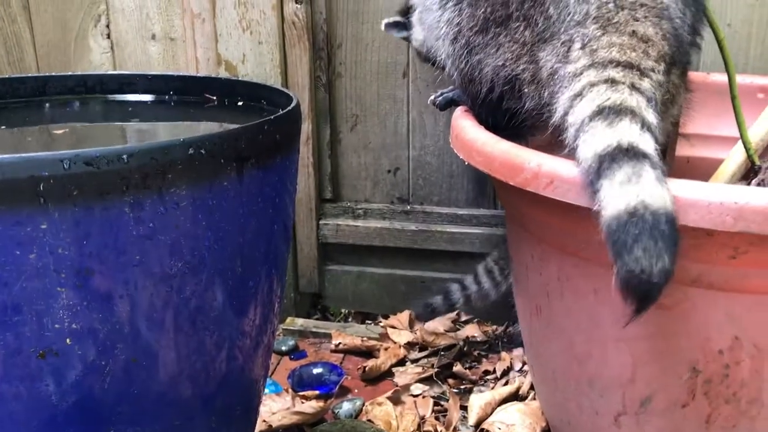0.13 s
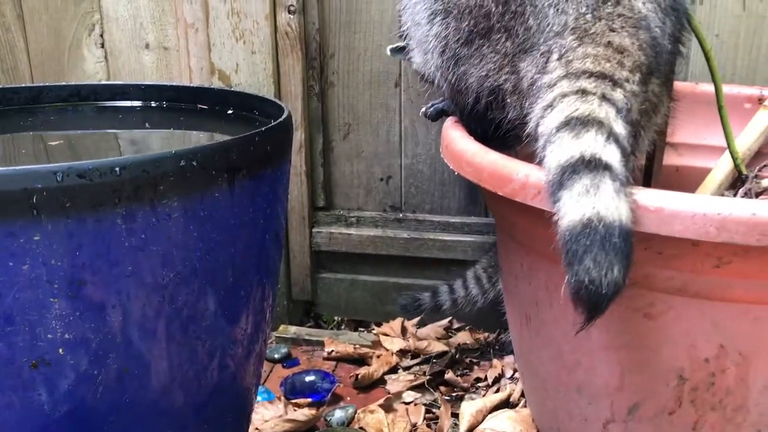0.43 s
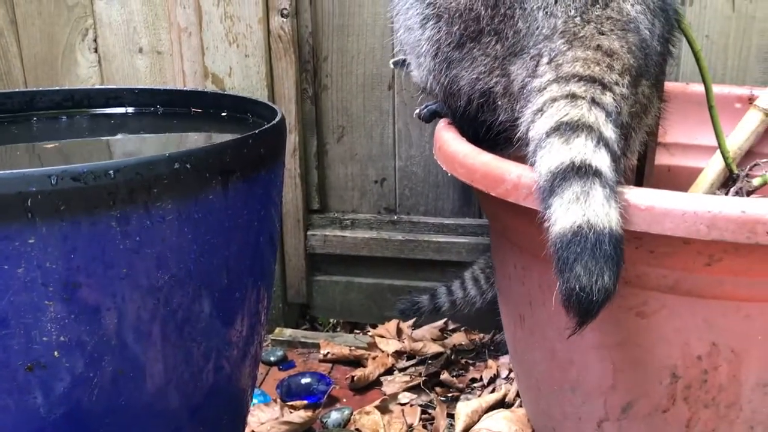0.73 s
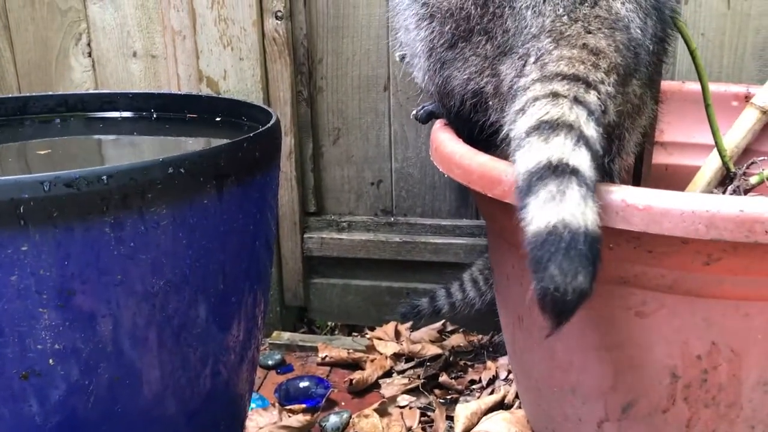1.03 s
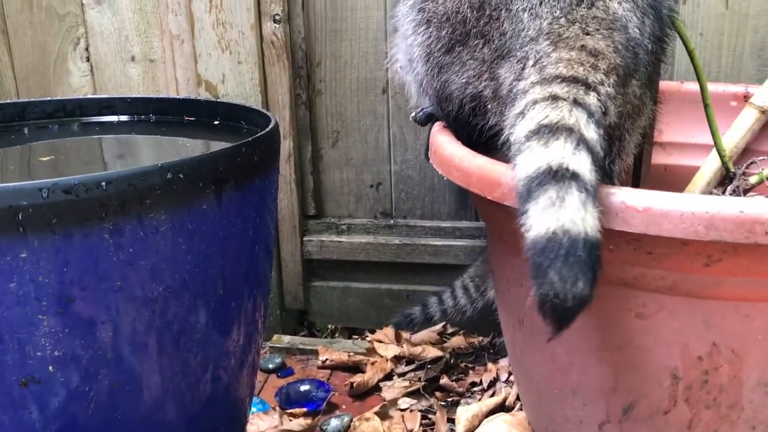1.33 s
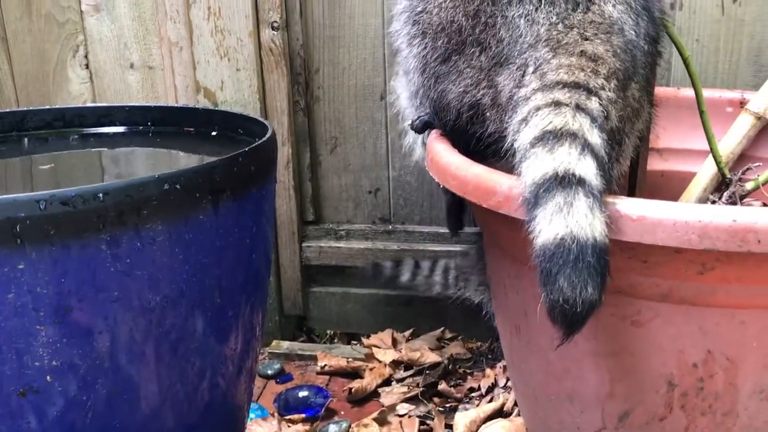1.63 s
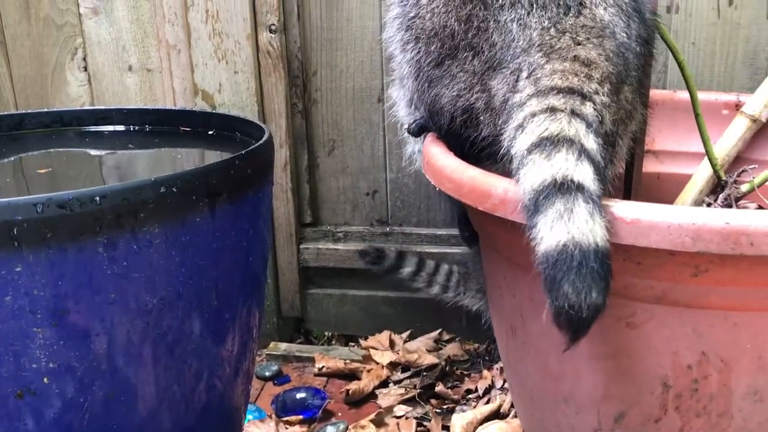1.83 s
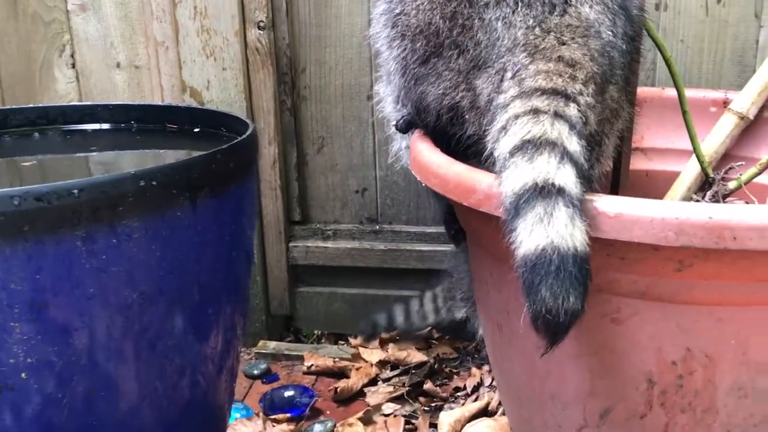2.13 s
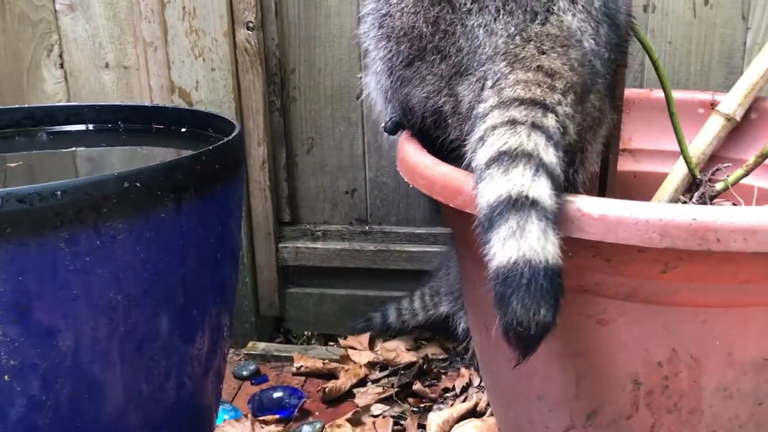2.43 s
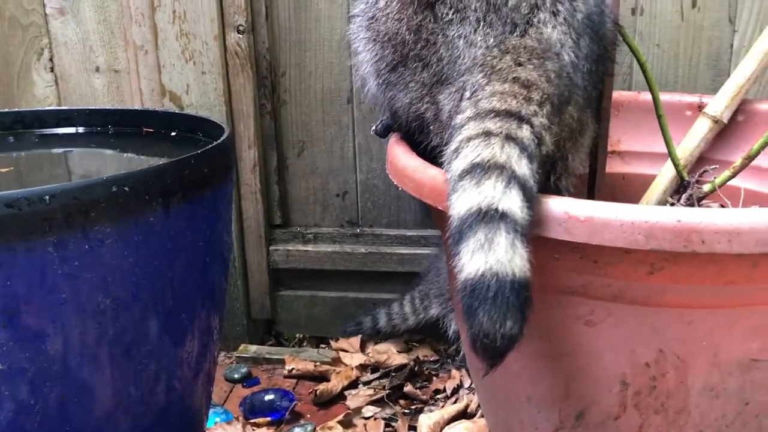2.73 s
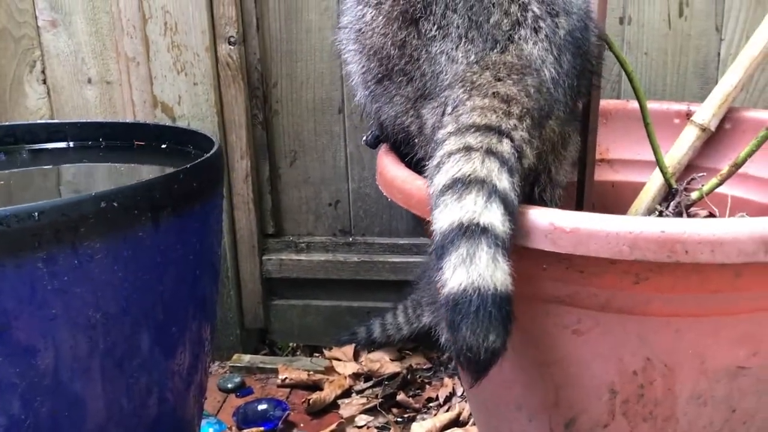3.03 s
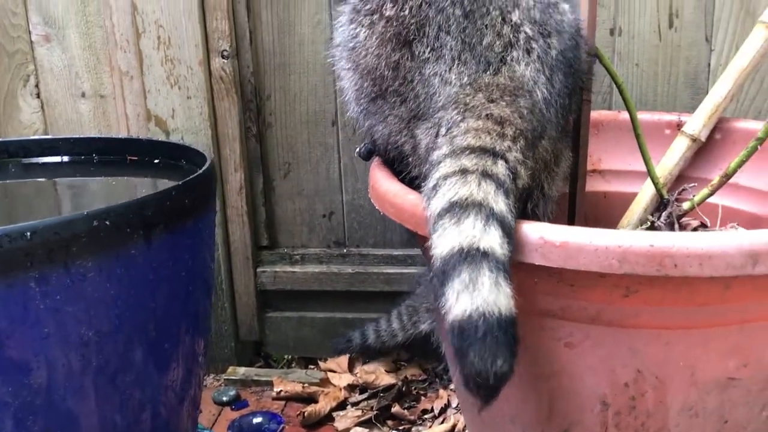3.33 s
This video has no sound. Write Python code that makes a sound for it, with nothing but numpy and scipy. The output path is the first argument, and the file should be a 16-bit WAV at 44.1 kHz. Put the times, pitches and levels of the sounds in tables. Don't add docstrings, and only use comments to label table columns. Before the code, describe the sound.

Raccoon chitter in a quiet garden, close and dry, over low traffic rumble, motor drone and soft hiss. Sparse faint scrapes and rustles until 1.26 s, then a rapid nasal trill of five tiny chirps to 1.48 s with soft pot knocks. Sharper clacks at 1.85 s; a loud scrape and leaf crackle from 2.2 to 2.5 s. From 3.24 s, four rounder, lower chirps, then two higher, harsher ones to 3.48 s.

```python
import sys
import numpy as np
from scipy import signal
from scipy.fft import rfft, irfft
from scipy.io import wavfile
from scipy.ndimage import uniform_filter1d

SR = 44100
rng = np.random.default_rng(int(sys.argv[2]) if len(sys.argv) > 2 else 0)


def gain_from_decibels(decibels):
    exponent = np.asarray(decibels, float) / 20
    return 10 ** exponent


def to_wav(sig):
    pcm = np.clip(np.atleast_2d(sig), -1, 1) * 32767
    pcm = np.round(pcm).astype(np.int16)
    wavfile.write(sys.argv[1], SR, pcm.T)


N = 154350


def evened(x):
    return x / np.sqrt(np.mean(x ** 2) + 1e-20)


def read(points, hz):
    f, value = np.transpose(points)
    return np.interp(np.log(hz + 1), np.log(f + 1), value)


def add(mix, start, sound):
    part = mix[round(start * SR):][:len(sound)]
    part += sound[:len(part)]


def resonate(x, hz, width):
    turn = np.exp(2j * np.pi * np.cumsum(hz * np.ones(len(x))) / SR)
    r = np.exp(-np.pi * width / SR)
    return 2 * (turn * signal.lfilter([1 - r], [1, -r], x / turn + 1e-18)).real


def chirp(row, first, last, peak, rough, throat):
    start, length, db, pitch_hz, overtones_db = row
    u = np.arange(0, length, 1 / SR) / length
    wobble, breath, shimmer = rng.standard_normal((3, len(u)))
    harsh = gain_from_decibels(overtones_db)

    rise = np.minimum(u / peak, 1)
    fall = np.clip((u - peak) / (1 - peak), 0, 1)
    hz = pitch_hz * (first + (1 - first) * np.sin(np.pi / 2 * rise) ** 1.275 + (last - 1) * fall)
    turns = np.cumsum(hz * (1 + 0.12 * harsh * evened(uniform_filter1d(wobble, 80)))) / SR

    folds = sum(np.cos(2 * np.pi * k * turns) for k in range(2, 13))
    puffs = evened(breath * (0.81 + np.exp(-(turns % 1) / 0.64)))
    rough = min(rough + 0.6 * harsh, 1)
    drive = (1 - rough) * evened(folds) + rough * puffs

    mouth = 1 + 0.03 * rng.standard_normal(len(throat))
    overtones = 0
    for k, (f, width, gain_db) in enumerate(throat):
        ring = resonate(resonate(drive, f * mouth[k], width), f * mouth[k], width)
        overtones = overtones + (-1) ** k * gain_from_decibels(gain_db) * ring

    shimmer_db = 6 * harsh * evened(uniform_filter1d(shimmer, 60))
    tone = np.sqrt(2) * np.sin(2 * np.pi * turns) * gain_from_decibels(shimmer_db)
    tone = tone + gain_from_decibels(3) * harsh ** 2 * evened(resonate(resonate(puffs, hz, 300), hz, 300))
    tone_shape = (np.sin(np.pi / 2 * rise) * np.cos(np.pi / 2 * fall)) ** 1.34
    overtone_shape = np.sin(np.pi * u ** 1.16) ** 2
    return start, gain_from_decibels(db) * (tone * tone_shape + harsh * evened(overtones) * overtone_shape)


# start in seconds, length in seconds, level in dB, pitch in Hz, overtones in dB.
FIRST_TRILL = [
    (1.26, 0.02, -54.5, 900, -38),
    (1.312, 0.017, -42, 831, -10),
    (1.361, 0.017, -48.5, 823, -5.5),
    (1.409, 0.0145, -48.5, 818, -3.5),
    (1.463, 0.0167, -53.5, 903, -2.5),
]
SECOND_TRILL = [
    (3.238, 0.015, -40.5, 655, -28),
    (3.277, 0.022, -43, 679, -12.5),
    (3.325, 0.017, -39, 624, -27.5),
    (3.367, 0.02, -38.5, 650, -26.5),
]
LAST_BURSTS = [
    (3.411, 0.0242, -52, 833, -3.5),
    (3.455, 0.0276, -41.5, 872, -11),
]
# centre in Hz, width in Hz, level in dB.
FIRST_THROAT = [(1400, 610, -2), (2400, 340, 1), (3060, 780, 1.5), (4320, 400, 0), (5240, 900, -2.5),
                (7440, 520, -1.5), (8850, 5100, -10)]
SECOND_THROAT = [(1450, 800, 0), (2200, 700, 0), (3700, 600, -17), (5200, 600, -20)]
LAST_THROAT = [(1500, 690, 10), (2540, 330, 3), (3480, 500, -4), (5140, 450, -10)]


def trills(mix):
    for row in FIRST_TRILL:
        add(mix, *chirp(row, first=1.08, last=0.88, peak=0.27, rough=0.17, throat=FIRST_THROAT))
    for row in SECOND_TRILL:
        add(mix, *chirp(row, first=0.82, last=0.97, peak=0.5, rough=0.35, throat=SECOND_THROAT))
    for row in LAST_BURSTS:
        add(mix, *chirp(row, first=0.5, last=0.74, peak=0.52, rough=0.35, throat=LAST_THROAT))


# start in seconds, level in dB, pitch in Hz, rise in seconds, 60 dB decay in
# seconds.
KNOCKS = [(1.305, -55, 374, 0.0049, 0.1), (1.306, -56, 199, 0.0047, 0.046),
          (1.355, -55.5, 353, 0.0066, 0.12), (1.358, -48.5, 180, 0.0041, 0.049),
          (1.407, -43, 317, 0.0042, 0.026), (1.41, -50.5, 188, 0.0039, 0.12),
          (1.462, -38.5, 277, 0.0021, 0.013), (1.466, -53.5, 620, 0.0031, 0.018),
          (1.467, -54.5, 3200, 0.0022, .03), (1.468, -44, 340, 0.0057, 0.018),
          (1.488, -51.5, 327, 0.0019, 0.074), (1.490, -48, 4720, 0.0017, 0.014),
          (1.839, -43, 314, 0.0017, 0.024), (1.838, -46.5, 1400, 0.0024, .015),
          (1.8375, -67, 2650, 0.00078, .012), (1.852, -54.5, 890, 0.0043, 0.033),
          (1.8605, -38.5, 964, 0.0034, 0.015), (1.861, -48.5, 1450, 0.0015, .015),
          (1.862, -61, 2670, 0.0028, 0.018), (1.870, -51, 1091, 0.0014, 0.017),
          (1.881, -61, 1070, 0.0036, .03), (2.175, -58.5, 621.5, 0.0024, 0.026),
          (2.2198, -35.5, 2970, 0.00022, 0.013), (2.234, -58, 357, 0.0045, 0.14),
          (2.234, -58, 1160, 0.0018, .03), (2.250, -49, 880, 0.0012, 0.023),
          (2.3307, -55, 4700, .0006, .01), (2.3903, -60, 3202, .0008, 0.014),
          (2.4628, -59, 2460, 0.00067, 0.011), (2.464, -53.5, 1040, 0.0016, 0.032),
          (2.288, -56, 1350, 0.0053, 0.017), (3.277, -51, 216, 0.009, 0.036),
          (3.321, -46, 374, 0.0024, 0.011), (3.411, -51, 303, 0.002, 0.017),
          (3.478, -48, 775, 0.0026, 0.041), (3.458, -43, 235, 0.0017, 0.042)]


def knocks(mix):
    for start, db, hz, rise, t60 in KNOCKS:
        t = np.arange(0, rise + t60, 1 / SR)
        attack = np.sin(np.pi / 2 * np.minimum(t / rise, 1)) ** 2
        decay = gain_from_decibels(-60 * np.maximum(t - rise, 0) / t60)
        add(mix, start, np.sqrt(2) * gain_from_decibels(db) * attack * decay * np.sin(2 * np.pi * hz * t))


def grating(start, length, db, hz, spread, rise, fade_db):
    size = 8192
    chance, strength, sign, clumps = rng.random((4, size))
    hits = chance < 2500 / SR
    grits = hits * gain_from_decibels(-3.5 * np.log(strength + 0.16)) * np.sign(sign - 0.5)
    grits = grits + 0.8 * (sign - 0.5)
    grits = grits * gain_from_decibels(1.8 * evened(uniform_filter1d(clumps - 0.5, size=100)))
    f = np.fft.rfftfreq(size, 1 / SR)
    band = np.exp(-0.5 * (np.log2((f + 1) / hz) / spread) ** 2)
    skirt = gain_from_decibels(-14) * spread * (f > 500) / (1 + f / 9000)
    u = np.arange(size) / SR / length
    shape = np.minimum(u / rise, 1) * gain_from_decibels(fade_db * u ** 1.14)
    return start, gain_from_decibels(db) * shape * evened(irfft(rfft(grits) * (band + skirt)))


# start in seconds, length in seconds, level in dB, centre in Hz, spread in octaves.
SCRAPES = [(0.195, 0.019, -68, 8000, 0.71), (.572, 0.0096, -63.5, 5000, 0.65),
           (0.824, 0.0072, -55, 9600, 0.78), (1.136, .012, -69, 11000, 0.91),
           (1.485, 0.027, -53, 7550, 0.57), (1.611, 0.023, -57, 7900, 1.), (1.639, 0.019, -63, 5000, 1.3),
           (1.8366, 0.012, -49, 14500, 0.83), (1.837, 0.0058, -51.5, 1500, 0.87),
           (1.846, 0.023, -49, 5000, 2.3), (1.857, 0.023, -53, 4500, 3.1), (1.992, 0.012, -62.5, 7000, 1.1),
           (2.2185, 0.008, -42.5, 4130, 0.88), (2.222, 0.028, -42, 2000, 1.46),
           (2.3296, 0.016, -52.5, 4670, 1.1), (2.390, 0.005, -53.5, 5807, 1.5),
           (2.413, 0.11, -68, 3500, 1.1), (2.462, 0.021, -58, 2100, 1.5), (2.508, 0.023, -69, 5500, 0.77),
           (2.594, 0.025, -67, 3650, 0.61), (2.978, 0.02, -54.5, 8800, 1.9),
           (3.199, 0.019, -55.5, 2790, 1.1), (3.21, 0.02, -64, 2660, 0.16),
           (3.241, 0.0073, -53.5, 3970, 0.099)]


def scrapes(mix):
    for row in SCRAPES:
        add(mix, *grating(*row, rise=0.16, fade_db=-12))


# start in seconds, level in dB, centre in Hz, spread in octaves.
TICKS = [(1.4913, -46, 7000, 0.83), (1.607, -56, 7000, .8), (1.626, -53, 7000, 0.46),
         (1.6435, -57, 6000, 1.), (1.851, -58, 4530, 0.35), (2.2248, -60, 5000, 0.81),
         (2.235, -45, 3000, 0.73), (2.245, -44.5, 2200, 1.2), (2.268, -58, 11000, .6),
         (2.277, -55, 11500, .5), (2.2818, -49, 9000, .8), (2.289, -55, 11000, .7),
         (2.294, -51, 5000, 0.44), (2.301, -51, 8000, 0.93), (2.312, -59, 5500, 0.31),
         (2.3346, -63, 4445, 0.88), (2.348, -59, 10000, .9), (2.365, -63, 6000, .6),
         (2.399, -56, 8000, 0.9), (2.413, -58.5, 3200, 0.26), (2.434, -66, 3500, .6),
         (2.447, -60, 3200, 0.48), (2.465, -63, 3000, 0.69), (2.471, -68, 4500, .9),
         (2.984, -57, 9000, 1.42), (3.201, -51.5, 2900, 0.42), (3.305, -67, 4500, .3),
         (3.346, -58, 3300, 0.14)]


def leaf_ticks(mix):
    for start, *row in TICKS:
        add(mix, *grating(start, 0.0015, *row, rise=0.16, fade_db=-7))


# start in seconds, length in seconds.
RUSTLE_SPANS = [(0., .04), (.098, .045), (.84, .06), (1.42, .11), (1.57, .11), (2.12, .1), (2.24, .27),
                (2.266, .05), (2.525, .04), (2.77, .17), (3.26, .2), (1.32, .2), (2.125, .08), (3.47, .04)]
# level in dB, centre in Hz,
# spread in octaves.
RUSTLE_COLOURS = [(-64.5, 5500, 0.97), (-56.5, 5900, 0.75), (-65, 1800, 0.84), (-64, 4400, 1.1),
                  (-58.5, 5200, 1.1), (-55, 1520, 1.6), (-63.5, 4700, 1.23), (-52.5, 1500, 2.2),
                  (-63, 2200, 1.2), (-76, 6500, 0.11), (-66.5, 2700, 2.3), (-67, 3400, 0.21),
                  (-65, 5850, 0.088), (-58, 1300, 0.59)]


def rustles(mix):
    for span, colour in zip(RUSTLE_SPANS, RUSTLE_COLOURS):
        add(mix, *grating(*span, *colour, rise=0.25, fade_db=-13))


def fence(x):
    taps = np.zeros(8000)
    taps[np.arange(200, 7980, 20) + rng.integers(0, 20, 389)] = rng.choice([-1., 1.], 389)
    taps *= gain_from_decibels(-60 * np.arange(8000) / SR / 0.08)
    return signal.fftconvolve(x, taps / np.linalg.norm(taps))[:N]


def wash(spectrum, patchy_db, size):
    hz = np.fft.rfftfreq(size, 1 / SR)
    a, b, patches = rng.standard_normal((4 * N // size + 5, len(hz), 3)).T
    patches = evened(uniform_filter1d(uniform_filter1d(patches, 10, 0), 10, 1))
    db = read([(5, -90)] + list(spectrum), hz)
    z = (a + 1j * b) * gain_from_decibels(db[:, None] + patchy_db * patches)
    return evened(signal.istft(z, nperseg=size, noverlap=3 * size // 4)[1][:N])


# frequency in Hz, density in dB per Hz.
HISS_SPECTRUM = [(82, -77), (140, 2.5), (234, -7), (433, -9.5), (518, -13), (1120, -8.5), (3210, -26),
                 (6560, -28), (16000, -35.5)]
RUMBLE_SPECTRUM = [(14, -22), (24, -22.5), (43, 2.5), (65, -0.5), (90, 1), (160, -13), (210, -43.5),
                   (350, -120)]
# time in seconds, level in dB.
HISS_LEVEL = [(0., 1.5), (.5, 0), (1.3, 0.5), (1.7, 1.5), (2.6, -1.5), (3.5, 2)]
RUMBLE_LEVEL = [(0., -48.5), (.25, -49.5), (.9, -55), (1.3, -48.5), (1.6, -50), (2.6, -51), (3.5, -49)]
# time in seconds, pitch in Hz, level in dB.
DRONE = [(0., 51.74, -58), (.7, 54.43, -57.5), (1.401, 60.8, -53.5), (1.75, 79.8, -62), (2.7, 79.64, -54.5),
         (3.5, 71.3, -73)]


def far_traffic():
    t = np.arange(N) / SR
    s, hz, db = np.transpose(DRONE)
    pitch = np.interp(t, s, hz)
    hum = np.sqrt(2) * np.sin(2 * np.pi * np.cumsum(pitch) / SR)
    waver = evened(resonate(rng.standard_normal(N), pitch, width=13.0))
    drone = (0.54 * hum + 0.78 * waver) * gain_from_decibels(np.interp(t, s, db))
    rumble_db = np.interp(t, *np.transpose(RUMBLE_LEVEL)) - 2.5
    rumble = wash(RUMBLE_SPECTRUM, patchy_db=1., size=4096) * gain_from_decibels(rumble_db)
    hiss_db = np.interp(t, *np.transpose(HISS_LEVEL)) - 63
    hiss = wash(HISS_SPECTRUM, patchy_db=1., size=1024) * gain_from_decibels(hiss_db)
    return drone + rumble + hiss


def scene():
    near = np.zeros(N)
    trills(near)
    knocks(near)
    scrapes(near)
    leaf_ticks(near)
    rustles(near)
    return (near + gain_from_decibels(-17.5) * fence(near) + far_traffic())[None]


def roll_off(x):
    return signal.sosfilt(signal.butter(12, 16500, fs=SR, output="sos"), x)


# centre in Hz, width in Hz, depth in dB.
PORT_DIPS = [(4920, 144, -3), (7640, 370, -2.5), (10320, 540, -3.5)]


def record(dry):
    f = np.fft.rfftfreq(N, 1 / SR)
    dips = gain_from_decibels(sum(db * np.exp(-0.5 * ((f - hz) / width) ** 2) for hz, width, db in PORT_DIPS))
    low_cut = 1 / (1 + (33.6 / (f + 1)) ** 6)
    top_edge = np.clip((15900 + 700 - f) / 800, 0, 1) ** 8
    mix = irfft(rfft(dry) * dips * low_cut * top_edge, N)
    return roll_off(mix)


dry = scene()
out = record(dry)
to_wav(out)
```